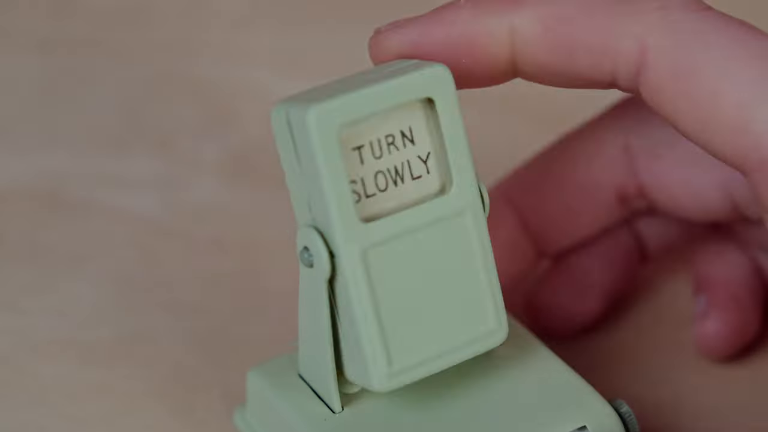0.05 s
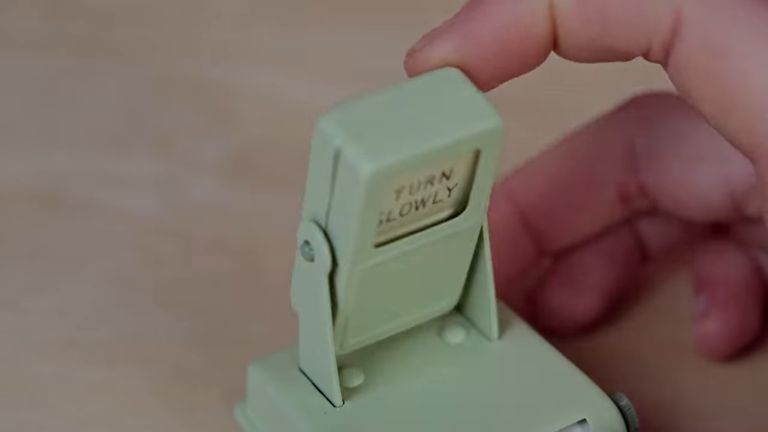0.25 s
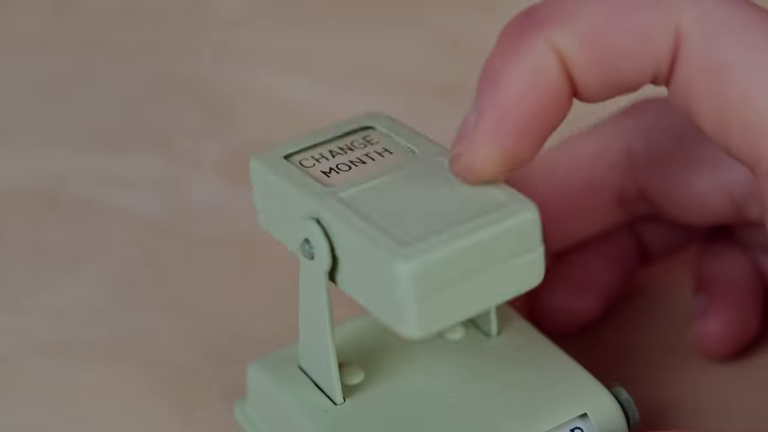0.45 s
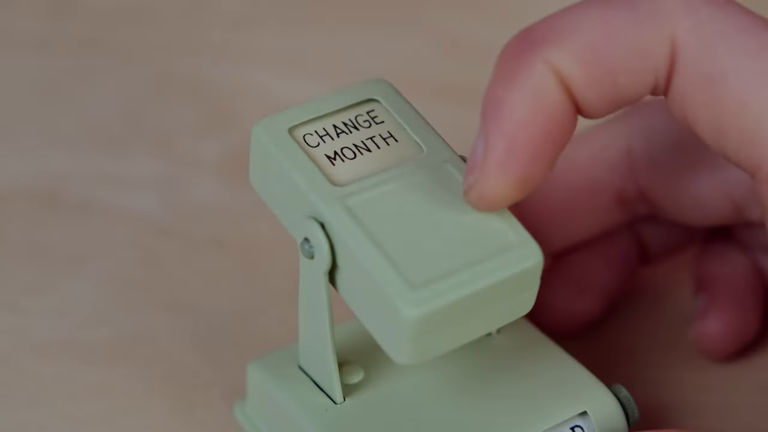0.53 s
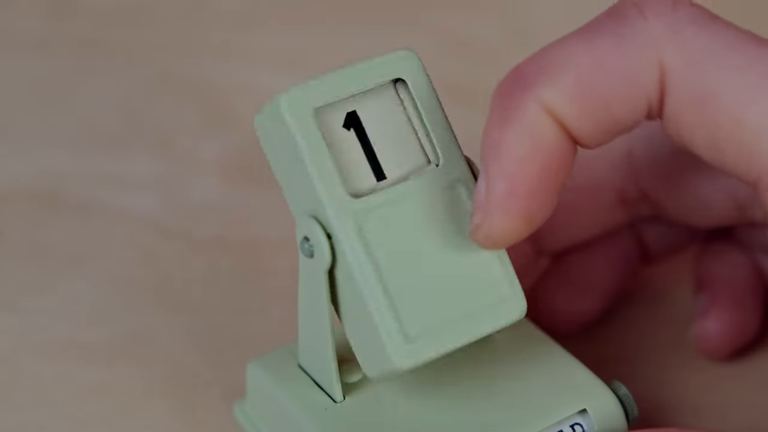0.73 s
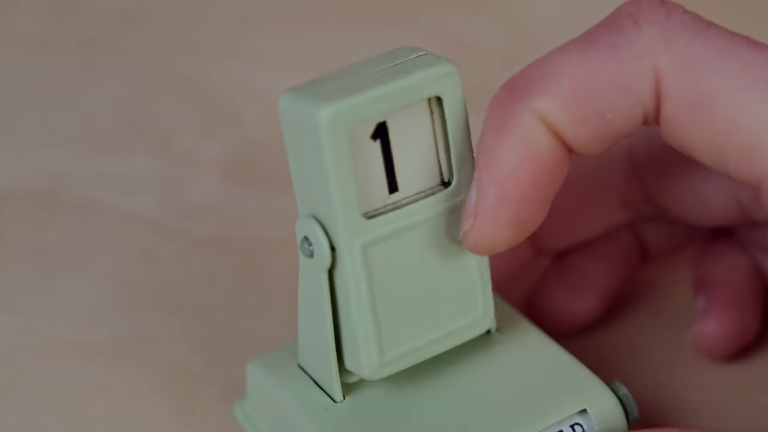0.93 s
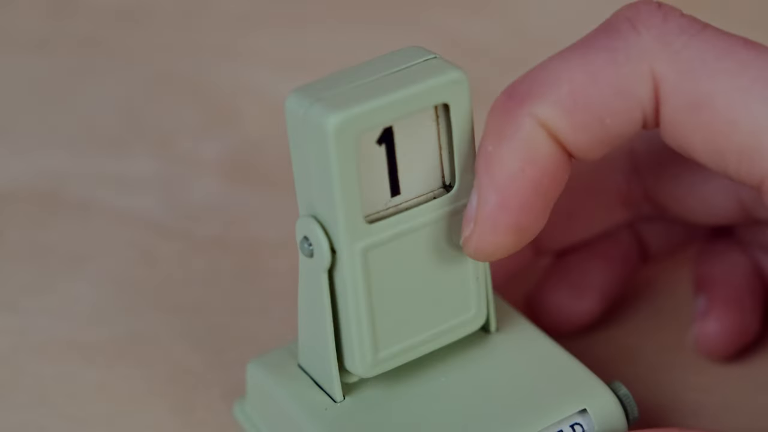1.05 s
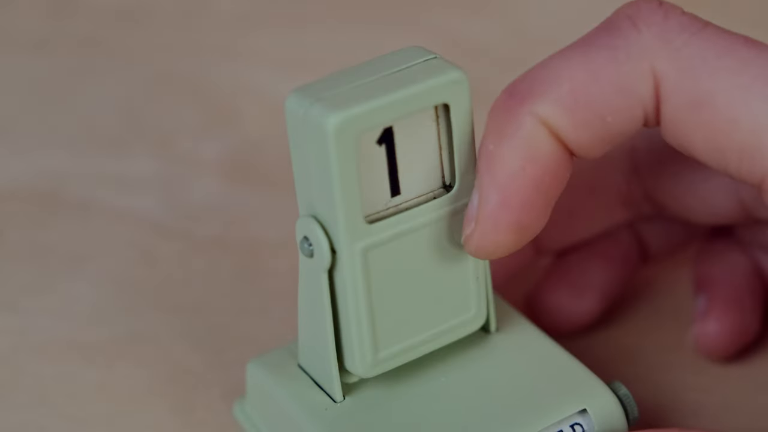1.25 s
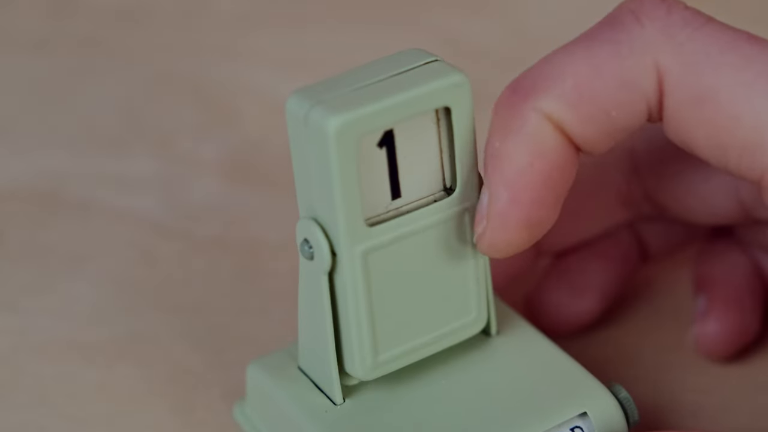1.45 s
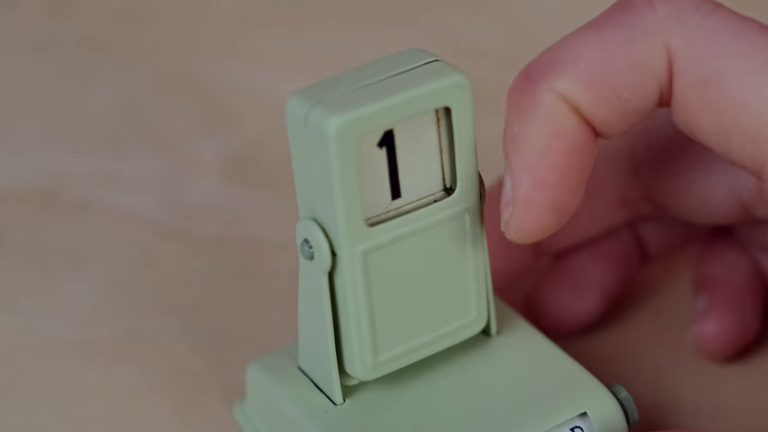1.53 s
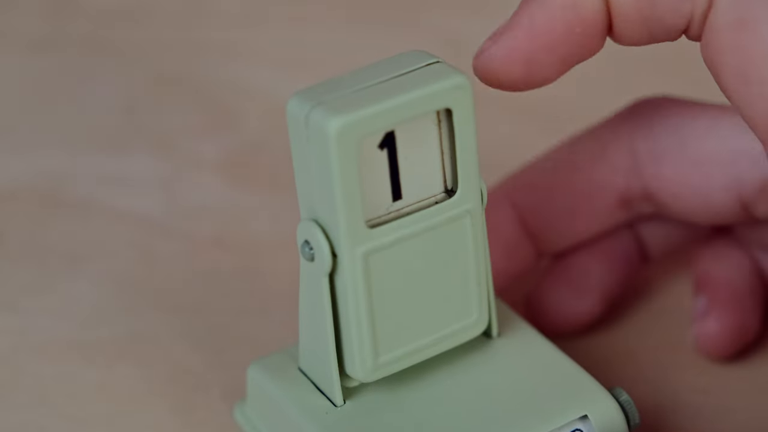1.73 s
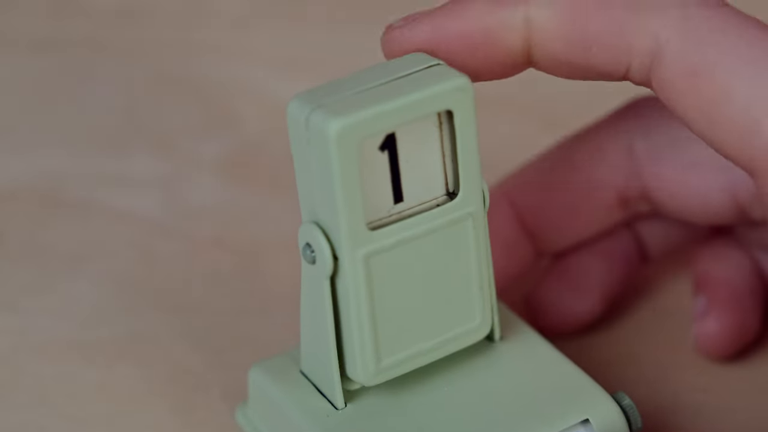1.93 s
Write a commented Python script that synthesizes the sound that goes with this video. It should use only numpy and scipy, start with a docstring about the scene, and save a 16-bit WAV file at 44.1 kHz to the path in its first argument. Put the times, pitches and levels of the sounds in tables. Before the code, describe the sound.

A metal flip calendar rattles close up as its plates slide and drop in a fast run of clicks and clacks, ringing faintly. After a pause comes a softer scraping click, with low indoor rumble and hiss underneath.

```python
"""A small metal flip calendar on a desk in a quiet room, turned over by hand close to the microphone.
For the first 0.8 s date plates slide inside the tumbling case and drop against its walls and each other.
Every contact cracks and rings the case; heavy drops thud into the desk, and the frame rings on faintly.
A finger rubs the case; a soft, scratchy click comes near 1.5 s, and a last faint slide follows.
Low room rumble and faint hiss lie underneath throughout."""
import sys
import numpy as np
from scipy import signal
from scipy.fft import rfft, irfft
from scipy.io import wavfile
from scipy.ndimage import uniform_filter1d

SR = 44100
rng = np.random.default_rng(int(sys.argv[2]) if len(sys.argv) > 2 else 0)


def dump(signal):
    """Clip the signal to [-1, 1] and save it as 16-bit WAV at the path in sys.argv[1]."""
    limited = np.clip(np.atleast_2d(signal).T, -1, 1)
    pcm = np.round(limited * 32767).astype(np.int16)
    wavfile.write(sys.argv[1], SR, pcm)


N = 88200
FRICTION_FADE_S = 0.0028


def plate_drops(size=2048):
    """Each plate lands with a crack and a damped note; it rings the case and, if left free, itself."""
    # plate contacts: start_s, level_db, body_db, treble_db, decay_ms, note_hz, note_db, case_db, plate_db
    drops = [(.0889, -36.5, 6, -13, 3.3, 1390, 7, 5.5, -20), (.1969, -11, 8, 8.5, 1.2, 3200, -7, 10, -7),
             (.2, -5.5, 1.5, 1.5, 1.6, 1795, -2.5, 13, -15),
             (.2078, -1.5, -3, -3, 1.43, 1810, -7.5, 3.5, -25),
             (.2102, -17.5, -17, 1, 1, 3150, 5, -17, -22), (.2912, -2, -4.5, -1, 3.9, 3660, -5, 0.5, -19),
             (.2975, -8, 5.5, -11, 1.1, 3300, -10.5, -19, -13),
             (.3058, -7.5, 1, -1, 1.8, 3000, 1, 1.5, -10), (.358, -1.5, 0, 5, 2.2, 9520, 4.5, 3, -3.5),
             (.367, -8, 5, -9, 1.6, 5550, -9, -15, -15), (.3707, 4.5, -4, -2, 0.4, 11200, -2, 1.5, -4),
             (.3775, -13.5, 6, 12, 1.9, 3440, -7, -8, -17), (.4112, -16, -6, 3.5, 2, 5060, -17, -1, -4),
             (.4264, -11, -8, -16, 1.9, 2400, -9, -7, -13.5), (.4338, -14, 0, 0.5, 3.4, 5300, -18, 9, -14),
             (.4352, -16.5, -15, -6, .76, 3730, -4, -4, -11),
             (.5356, -6.5, -3.5, -5, 7.9, 11060, -8, -19, -5),
             (.5425, -21, 3, -16, 2.3, 2690, -0.5, 9.5, -13.5),
             (.6422, 2.5, -8, -7, 1.1, 5600, -5.5, 8.5, -10),
             (.6448, -6, 3.5, -3.5, 2.5, 5880, 4.5, -30, -24),
             (.6502, -7.5, 5.5, -3.5, 4.8, 2840, 0, -5, 0), (.6598, -22, 12.5, -2, 1.4, 5440, 8, 6.5, 1),
             (.6642, -3, -3.5, -3.5, 1.3, 1630, -3, -16.5, -23),
             (.6698, -22, 1, -15, 1.3, 6750, 7, 12.5, -18), (.677, -14, 6.5, -2, 0.84, 4870, -1.5, 2, 4),
             (.7033, -20.5, -34, 1, 2.4, 4850, -6.5, -9, 10),
             (.7065, -3.5, -11, -2, 0.57, 5000, 0.5, -18, -1), (.712, -6.5, -9, -22, 4.7, 1530, -9, 0, 2),
             (.722, -19, -1, -8, 6, 5130, 6, 0, 6.5), (.7335, -9, 0.5, -17, 12, 9260, -12, -10.5, 0),
             (0.7437, 0, -3, 8.5, 1.04, 5180, -2.5, -12, -10.5),
             (.7645, -15.5, -4, -15, 2.6, 1580, -2.5, 4, -10),
             (.7988, -10, 11, 23.5, 0.64, 6580, 9.5, 1.5, 0.5),
             (.8175, -21.5, 12.5, 8, 2.2, 1530, 9, -7, -17),
             (1.459, -27.5, -3, -19, 0.42, 2400, 6.5, 7.5, -22),
             (1.462, -29, -9, -6, 2.5, 1720, 6.5, -16, -22), (1.4644, -21.5, 6, -3, 4.2, 2330, 6, -16, -24),
             (1.4663, -13, -4, 2, 0.99, 2340, -8, 3.5, -16)]
    # modes of a date plate: pitch_hz, level_db, t60_s
    plate_modes = [(4875, -9, 0.057), (4920, -11, 0.066), (5160, -3, 0.019), (9200, -13, 0.035),
                   (9000, -14.5, 0.087), (11020, -11, 0.05), (11200, -17, .045), (15200, -26, .035)]
    attack_s, note_decay_ratio = 0.00015, 0.89
    out, t = np.zeros(N), np.arange(size) / SR
    rise = 1 - np.exp(-t / attack_s)
    for start_s, level_db, body_db, treble_db, decay_ms, note_hz, note_db, case_db, plate_db in drops:
        decay_s = decay_ms / 1000
        rebounds = undb(3.5 * wander(rate_hz=1800)[:size])  # tiny bounces within one contact
        crack = chatter(rise * np.exp(-t / decay_s) * rebounds, body_db, treble_db)
        tone = np.sin(2 * np.pi * (note_hz * t + rng.random()))
        note = unit_energy(rise * np.exp(-t / (decay_s * note_decay_ratio)) * tone)
        add(out, start_s, undb(level_db) * through_case(crack + undb(note_db) * note, case_db))
        add(out, start_s, undb(level_db + plate_db) * ring(plate_modes, 2 * size))
    return out


def plate_slides(size=8192):
    """Plates scrape over each other in uneven grains, ringing the case."""
    # scrapes: start_s, length_s, level_db, body_db, treble_db, swell_db
    slides = [(0.091, 0.052, -67, 16.5, 1, -3), (0.178, 0.046, -43, 3, -9, 10.5),
              (0.277, 0.045, -43.5, -0.5, -12, 0.5), (.613, 0.039, -51, 10, -10, 9),
              (0.658, 0.042, -47, -11, -2, 2), (0.751, .048, -38, -6.5, -10, -3),
              (1.446, 0.022, -47, -1, -13, 15), (1.905, .12, -71, 5.5, -18, -4)]
    out, t = np.zeros(N), np.arange(size) / SR
    for start_s, length_s, level_db, body_db, treble_db, swell_db in slides:
        gate = np.clip(np.minimum(t, length_s - t) / FRICTION_FADE_S, 0, 1)
        grain_db = 3.5 * wander(rate_hz=520)[:size]
        grip = undb(swell_db * np.minimum(t / length_s, 1) + grain_db)
        scrape = through_case(chatter(gate * grip, body_db, treble_db), ring_db=3)
        add(out, start_s, undb(level_db) * np.sqrt(length_s * SR) * scrape)
    return out


def chatter(envelope, body_db, treble_db):
    """Metal chatters on metal: a noise burst, its spectrum evened out, then shaped in body and treble."""
    # tone of a metal contact: frequency_hz, level_db
    contact_tone = [(25, -22.5), (70, 0), (140, -1), (270, -21.5), (400, -7.5), (520, -7), (660, -12),
                    (850, -3), (1200, 0.5), (1600, 6), (2300, 4.5), (3200, 2.5), (4200, 2), (5300, 3),
                    (6800, 2), (8100, 0), (9000, 0), (10100, 0.5), (11300, -1), (12800, -2.5), (14000, -5),
                    (15000, -11), (16000, -10.5)]
    size, even_width_hz = len(envelope), 527
    hz = np.maximum(np.arange(size // 2 + 1) * SR / size, 1)
    burst = rfft(envelope * rng.standard_normal(size))
    smoothed = np.sqrt(uniform_filter1d(np.abs(burst) ** 2, max(int(even_width_hz * size / SR), 1)))
    tone_db = curve_db(contact_tone, hz) + curve_db([(1550, body_db), (5150, 0), (11800, treble_db)], hz)
    # a causal filter keeps the attack sharp
    cepstrum = irfft(np.log(undb(tone_db) / smoothed))
    causal = np.concatenate([cepstrum[:1], 2 * cepstrum[1:size // 2]])
    return irfft(burst * np.exp(rfft(causal, size)))


def through_case(force, ring_db, size=8192):
    """A force heard through the thin case: its modes ring and the loose stack buzzes briefly."""
    # modes of the case: pitch_hz, level_db, t60_s
    case_modes = [(377, -20.5, 0.18), (538.4, -19, 0.14), (792, -21.5, 0.053), (1032, -24.5, 0.043),
                  (1443, -45.5, 0.095), (1614, -41.5, 0.032), (1855, -27.5, 0.083), (2022, -34.5, 0.1),
                  (2865, -21.5, 0.037), (3010, -36, 0.064), (3296, -26.5, .05), (3680, -31, 0.043),
                  (4560, -33.5, 0.071), (6260, -30, .06), (7280, -31, .04), (9820, -27.5, 0.073)]
    # buzz of the loose stack of plates: centre_hz, width_hz, level_db
    rattle_bands = [(1460, 1500, -17), (3320, 2050, -13.5), (4800, 2900, -25.5), (6660, 7100, -15),
                    (8730, 940, -15.5), (11600, 570, -18), (12600, 5200, -19)]
    dying = fade(np.arange(size) / SR, t60_s=0.022)
    rattle = sum(undb(db) * unit_energy(noise_band(hz, width_hz, size) * dying)
                 for hz, width_hz, db in rattle_bands)
    out = signal.fftconvolve(force, undb(ring_db) * ring(case_modes, size) + rattle)
    add(out, 0, force)
    return out


def ring(modes, size):
    """Struck metal rings in decaying modes; each blow hits another spot, so strength and pitch vary."""
    scatter_db, detune_ratio = 4, 0.005
    out, t = np.zeros(size), np.arange(size) / SR
    for (hz, db, t60_s), (strength, detune, phase) in zip(modes, rng.standard_normal((len(modes), 3))):
        wave = np.sin(2 * np.pi * (hz * (1 + detune_ratio * detune) * t + phase))
        out += undb(db + scatter_db * strength) * unit_energy(wave * fade(t, t60_s))
    return out


def frame_ring():
    """The drop near 0.8 s leaves the whole frame ringing faintly."""
    # modes of the frame: pitch_hz, level_db, t60_s
    frame_modes = [(1800, -8, .38), (4813, -30, .25), (5610, -5, 0.52), (6530, -17, .1), (10800, -7, 0.16),
                   (11350, 19, 0.064), (11500, -4, .22), (11900, -11, 0.23)]
    out = np.zeros(N)
    add(out, start_s=0.799, sound=undb(-22.5) * ring(frame_modes, N // 4))
    return out


def desk_knocks():
    """The heavier drops pass through the stand into the desk as dull thuds."""
    # knocks of the stand: start_s, level_db
    knocks = [(0.199, -14.5), (0.293, -15.5), (0.364, -13.5), (0.536, -12), (0.642, -10), (0.661, -9.5)]
    pitch_hz, attack_s = 135.5, 0.0082
    out, t = np.zeros(N), np.arange(N // 8) / SR
    envelope = (1 - np.exp(-t / attack_s)) * fade(t, t60_s=0.16)
    thud = unit_energy(envelope * np.sin(2 * np.pi * pitch_hz * t))
    for start_s, level_db in knocks:
        add(out, start_s, undb(level_db) * thud)
    return out


def finger_rub():
    """Skin rubs on the case, dull and soft."""
    # touch of the finger: start_s, level_db
    rubs = [(1.165, -57)]
    decay_s = 0.087
    out, t = np.zeros(N), np.arange(N // 4) / SR
    envelope = np.minimum(t / FRICTION_FADE_S, 1) * np.exp(-t / decay_s)
    for start_s, level_db in rubs:
        add(out, start_s, undb(level_db) * envelope * noise_band(830, width_hz=220, size=len(t)))
    return out


def room(direct):
    """Close up, the direct sound leads; the room adds a faint, short tail with softened treble."""
    tail_db, delay_s, damping_hz = -20.5, 0.0038, 6100
    t = np.arange(N // 2) / SR
    air = signal.sosfilt(signal.butter(2, damping_hz, fs=SR, output="sos"), rng.standard_normal(len(t)))
    tail = unit_energy(air * fade(t, t60_s=0.31) * (t > delay_s))
    return direct + undb(tail_db) * signal.fftconvolve(direct, tail)[:N]


def room_tone():
    """Low rumble and a wavering hum sit in the centre, under smooth, slightly wider hiss."""
    # room noise per half octave: centre_hz, level_db
    floor = [(22, -57.5), (45, -60.5), (72, -56), (105, -62.5), (150, -58.5), (240, -58.5), (330, -66.5),
             (500, -69), (800, -70.5), (1400, -74), (3000, -74.5), (6000, -73), (11000, -68), (15500, -68)]
    # left-right difference relative to the centre: frequency_hz, level_db
    stereo_width = [(60, -35), (400, -21.5), (2000, -8.5), (12000, -6.5)]
    out = undb(-55.5) * noise_band(65.2, width_hz=16.5, size=N)  # the hum
    for hz in 22.1 * 2 ** (np.arange(20) / 2):
        drift_db = 1.5 * wander(rate_hz=5.3) * min(1, 800 / hz)  # steadier in the treble
        mid, side = (noise_band(hz, hz / np.sqrt(2) / 2, N) for _ in range(2))
        stereo = mid + undb(curve_db(stereo_width, hz)) * side * np.array([[1], [-1]])
        out = out + undb(curve_db(floor, hz) + drift_db) * stereo
    return out


def noise_band(centre_hz, width_hz, size):
    """Noise of rms 1 in a soft-edged band."""
    hz = np.arange(size // 2 + 1) * SR / size
    rolloff = 1 + (2 * (hz - centre_hz) / width_hz) ** 4
    noise = irfft(rfft(rng.standard_normal(size)) / rolloff, size)
    return noise / np.std(noise)


def wander(rate_hz):
    """Smooth random motion with a spread of 1."""
    span = max(int(SR / rate_hz), 1)
    motion = uniform_filter1d(uniform_filter1d(rng.standard_normal(N), span), span)
    return motion / np.std(motion)


def curve_db(points, hz):
    """Read a table of frequency_hz, level_db on a log-frequency axis."""
    points_hz, points_db = np.array(points).T
    return np.interp(np.log(hz), np.log(points_hz), points_db)


def fade(t, t60_s):
    """Exponential decay, 60 dB down at t60_s."""
    return np.exp(-np.log(1000) * t / t60_s)


def undb(db):
    """Decibels to gain."""
    return 10 ** (np.asarray(db) / 20)


def unit_energy(sound):
    """Scale to an energy of 1."""
    return sound / np.sqrt(np.sum(sound ** 2))


def add(out, start_s, sound):
    """Mix a sound in at a time."""
    first = int(start_s * SR)
    out[first:first + len(sound)] += sound[:len(out) - first]


def scene():
    """The calendar close and centred, over the room tone."""
    calendar = plate_drops() + plate_slides() + frame_ring() + desk_knocks() + finger_rub()
    return room(calendar) + room_tone()


def record(dry):
    """The recorder cuts the top off steeply."""
    top_hz = 16000
    return signal.sosfilt(signal.ellip(8, 0.2, 70, top_hz, fs=SR, output="sos"), dry)


dry = scene()
out = record(dry)
dump(out)
```